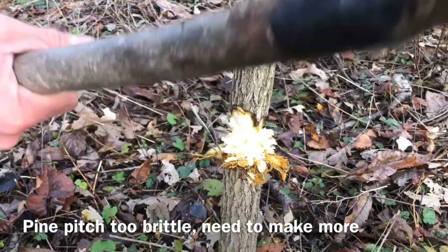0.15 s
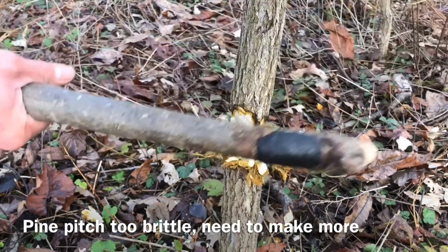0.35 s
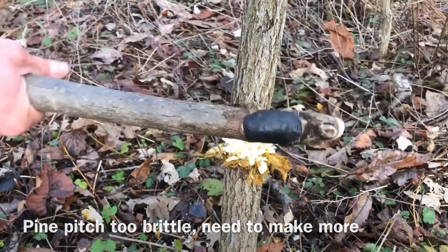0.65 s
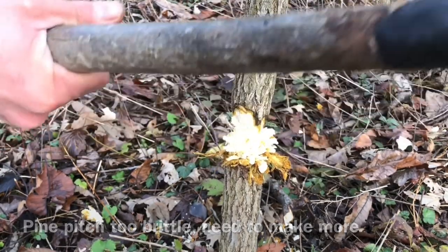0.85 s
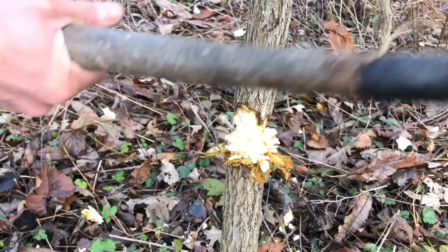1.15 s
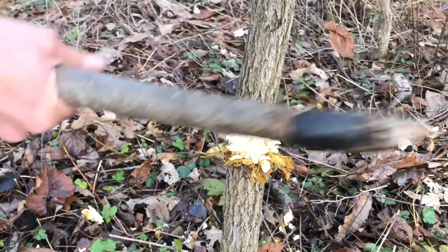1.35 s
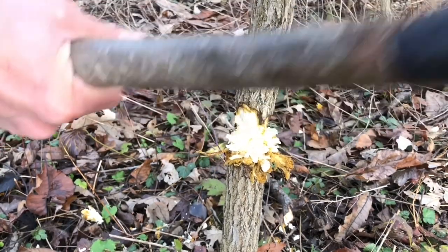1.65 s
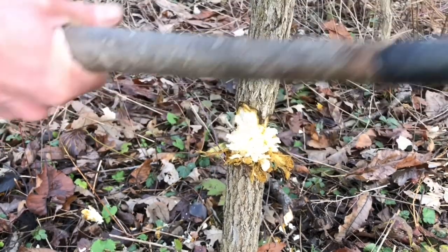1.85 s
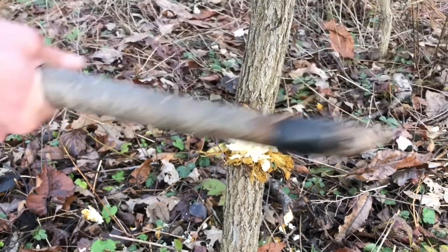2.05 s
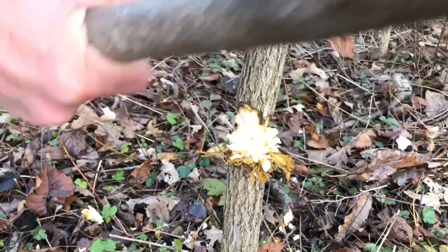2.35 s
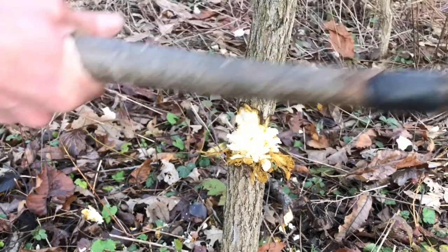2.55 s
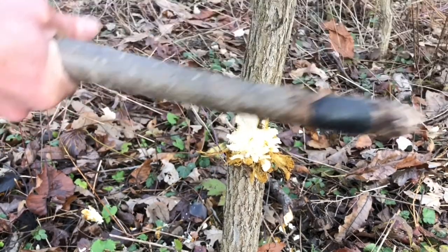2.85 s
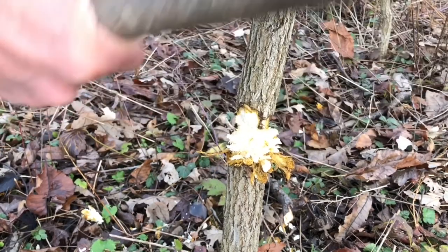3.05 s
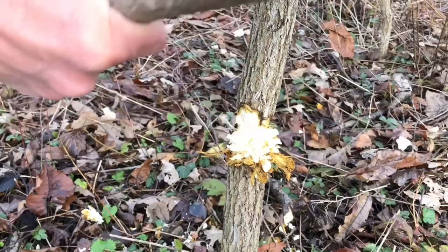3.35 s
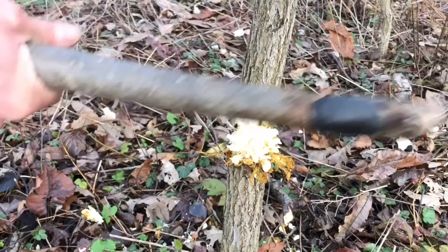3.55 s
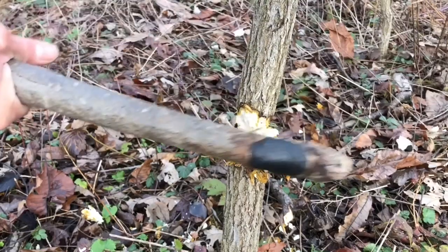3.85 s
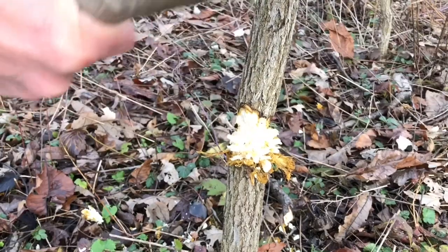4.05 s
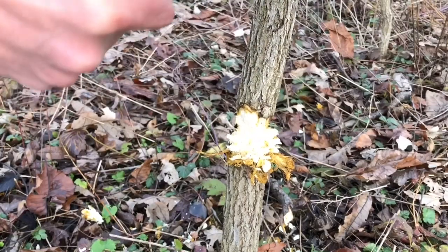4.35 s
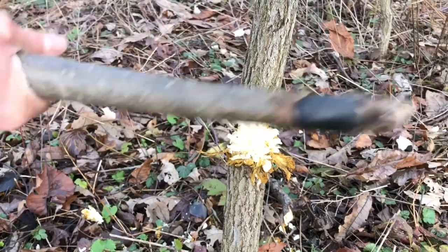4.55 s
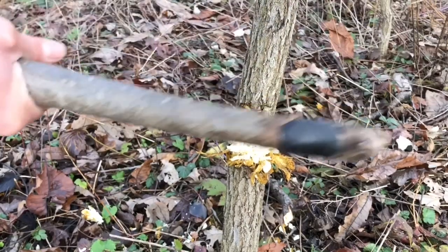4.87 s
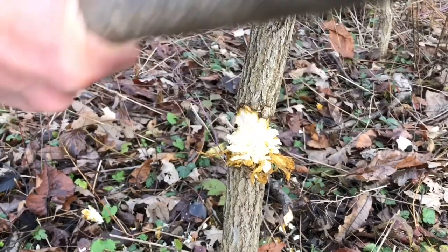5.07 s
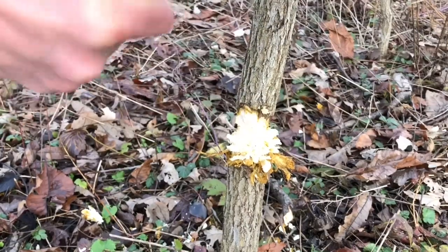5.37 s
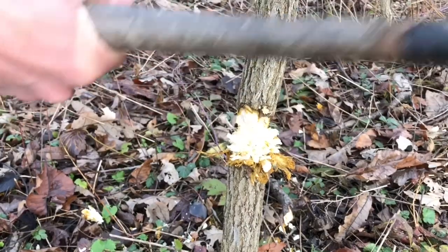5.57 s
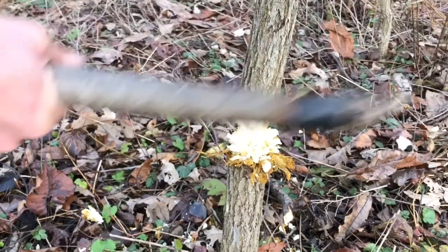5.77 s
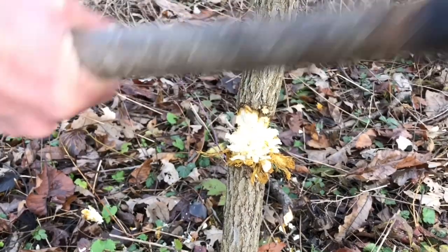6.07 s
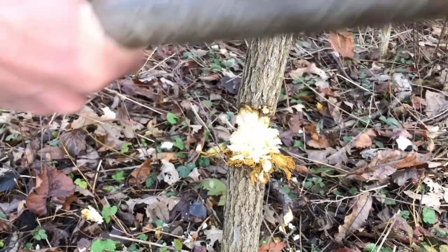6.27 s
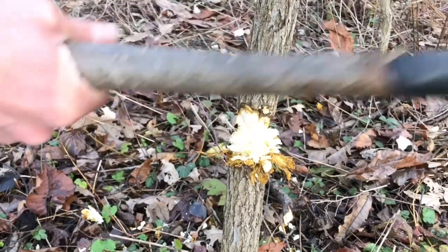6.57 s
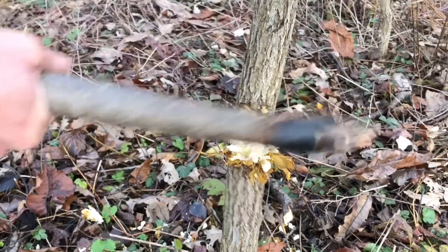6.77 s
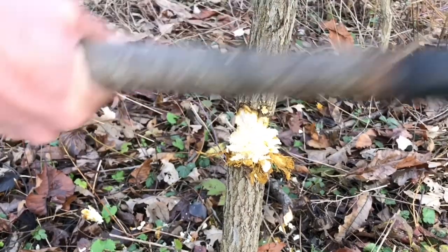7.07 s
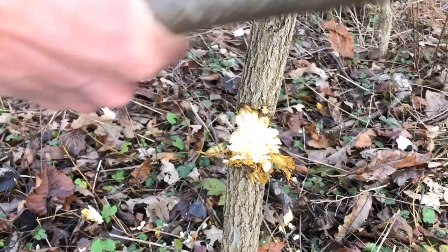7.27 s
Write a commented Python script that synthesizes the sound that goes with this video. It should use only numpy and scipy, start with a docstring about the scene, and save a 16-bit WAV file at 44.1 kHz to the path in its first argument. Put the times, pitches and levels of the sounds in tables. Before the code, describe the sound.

A hafted stone axe chops a thin standing trunk in a wood, close to a single microphone. The first blow lands at about 0.2 seconds, then twenty-one more follow evenly, roughly every third of a second, until 7.35. Each is a sharp, damped crack around 1.5 kHz, varying in force and pitch, with a brief hollow knock, quick rebound, slight low thud and crisp tearing fibres. Short echoes return from near brush, then the wood. Chips patter on dry leaves, most densely from 0.75 to 1.15, with scattered ticks later, notably at 4.1 and 5.1 to 5.4. Very bright, loud chip snaps fall between blows around 1.65, 2.0, 2.36, 2.7, 3.4, 3.7 and 6.7. Faint leaf rustle swells near 1.2. Far-off birds whistle briefly at 2.5, 3.45 and 6.9 and call nasally around 3.6 to 4.7 and 7.1, almost buried, over a very quiet distant rumble.

```python
"""A hafted stone axe chops a thin standing trunk in a wood, close to the microphone, three blows a second.
Each blow is a damped crack with edge modes, then ringing trunk and haft modes as the head knocks and rebounds.
Band-filtered noise makes the tearing fibres and the echoes off near brush and the wood.
Chips snap close by and patter on dry leaves as short noise-driven rings; fine ringing grains make the rustle.
Small birds whistle and call far off in gliding sines, over a low distant rumble of shaped noise."""
import sys
import numpy as np
from scipy import signal
from scipy.io import wavfile
from scipy.ndimage import uniform_filter1d

SR = 44100
rng = np.random.default_rng(int(sys.argv[2]) if len(sys.argv) > 2 else 0)


def master_out(mix):
    """Clip the mix to full scale and print it as 16-bit PCM to the path in sys.argv[1]."""
    frames = np.transpose(np.atleast_2d(mix))
    ceiling = np.clip(frames, -1, 1)
    pcm = np.round(ceiling * 32767).astype(np.int16)
    wavfile.write(sys.argv[1], SR, pcm)


N = 327222

# Spectrum of the distant rumble: (frequency [Hz], relative density [dB per Hz])
RUMBLE_SPECTRUM = [(25, -21.5), (55, 1), (90, -4), (140, -4.5), (225, -12), (560, -18), (880, -22.5),
                   (1370, -23.5), (2100, -28.5), (4300, -37.5), (9000, -39.5), (16000, -43.5)]
# Arched bird whistles: (start [s], length [s], level before shaping [dB])
WHISTLES = [(2.46, 0.037, -71), (3.452, .058, -66), (6.89, 0.066, -63)]
# Pitch arch of a whistle: (share of length [0-1], frequency [Hz])
WHISTLE_ARCH = [(0, 5600), (.2, 6700), (.45, 7300), (.7, 7100), (.88, 6200), (1, 4600)]
# Nasal bird calls: (start [s], length [s], start [Hz], middle [Hz], end [Hz], level before partials [dB])
NASAL_CALLS = [(3.6, .08, 3500, 3750, 3700, -66), (3.84, .13, 3650, 3880, 3800, -64),
               (4.09, .13, 3800, 3880, 3650, -64), (4.595, .1, 3850, 3980, 3850, -63),
               (7.08, .11, 3950, 4000, 3850, -63), (7.25, .09, 3800, 4000, 4000, -64)]
# Parallel partials of a nasal call: (offset [Hz], relative level [dB])
NASAL_PARTIALS = [(-370, -10), (5, -7), (370, -20)]
# Leaf rustle as it swells and dies down: (time [s], level of the grains [dB])
RUSTLE_LEVEL = [(0.0, -69.5), (0.4, -66), (0.6, -68), (1.15, -61.5), (1.42, -71.5), (1.9, -66), (2.5, -78),
                (7.42, -74.5)]
# Louder chips and bark landing on dry leaves:
# (time [s], level of the bright part [dB], ring [Hz], share at 4 kHz [dB])
LEAF_TICKS = [(0.207, -46, 6300, -18), (0.2903, -41.5, 7600, -14), (0.355, -41, 9500, -20),
              (0.4163, -42.5, 6000, -8), (0.7472, -46, 5180, -24.5), (0.7741, -42, 7000, -19),
              (0.83, -41, 7000, -3), (0.854, -38, 9170, 4.5), (0.8803, -36, 11200, -8),
              (1.0, -27, 7640, -29), (1.0408, -37, 6260, -22), (1.154, -38.5, 6620, -10.5),
              (1.5644, -46.5, 8550, -18), (1.7222, -34.5, 6360, -2), (1.8228, -43.5, 4960, -9),
              (1.8728, -42.5, 13100, -27.5), (2.0637, -35, 12500, -26), (2.77, -40.5, 10400, -29),
              (3.283, -44.5, 11200, -24), (3.4466, -42, 10600, -22), (4.126, -30.5, 6000, 6),
              (4.1408, -46.5, 6600, 11), (4.846, -49.5, 5690, -20), (4.238, -48, 9000, -20),
              (4.9144, -43.5, 5250, -31), (5.1048, -36, 6510, -16), (5.1575, -32.5, 6940, -1.5),
              (5.223, -46, 8200, -13), (5.322, -33.5, 13900, -20), (5.3988, -32.5, 6880, -1),
              (5.6354, -40.5, 5230, 8.5), (7.1003, -36, 13900, -21)]
# Flying chips that strike something hard near the microphone:
# (time [s], level of the bright part [dB], share at 4 kHz [dB])
CHIP_SNAPS = [(1.646, -6, -11.5), (1.9915, -1, -20), (2.3588, -5, -35), (2.4295, -26.5, -27),
              (2.7029, -1.5, -38), (3.3796, -2.5, -28), (3.7205, -2, -45), (4.4113, -20, -2.5),
              (5.0735, -10.5, -23), (5.4272, -18.5, -29), (6.3712, -19.5, -20), (6.714, -8, -13.5),
              (6.769, -22, -27), (7.0345, -10.5, -9.5)]
# Echoes of the wood: (frequency [Hz], relative level [dB])
WOOD_ECHO = [(55, -29.5), (90, -33), (150, -26.5), (230, -39), (450, -41), (800, -45), (1400, -31.5),
             (2500, -32), (4200, -32.5), (7000, -44), (16000, -55.5)]
# Decay of the wood echoes: (frequency [Hz], t60 [s])
WOOD_ECHO_T60 = [(60, 0.82), (150, 0.45), (500, 0.7), (1500, 0.56), (4000, 0.36), (16000, 0.28)]
# Echoes off near brush: (frequency [Hz], relative level [dB])
NEAR_ECHO = [(100, -49), (400, -20.5), (800, -19), (1500, -17), (4000, -23), (8000, -21), (16000, -22)]
# Decay of the near echoes: (frequency [Hz], t60 [s])
NEAR_ECHO_T60 = [(100, .2), (400, 0.099), (1500, 0.066), (5000, .09), (16000, 0.083)]
# Tearing fibres: (frequency [Hz], relative level [dB])
SPLINTER = [(700, -21.5), (1500, -15), (3000, -12.5), (5000, 1), (8000, 4), (12000, 8), (16000, 5)]
# Decay of the tearing: (frequency [Hz], t60 [s])
SPLINTER_T60 = [(500, 0.075), (1300, 0.058), (2900, 0.033), (6000, 0.013), (16000, 0.011)]
# Trunk and haft modes:
# (frequency [Hz], relative level [dB], t60 at the first contact [s], delay [s], 0 knock or 1 thud)
WOOD_MODES = [(72, 0.5, 0.1, .013, 1), (118.5, -8.5, 0.17, .008, 1), (153, 3, 0.081, .008, 1),
              (228, -12.5, 0.019, 0.002, 0), (278, -2.5, 0.012, 0.00084, 0), (312, -6, 0.043, .0025, 0),
              (378, 1.5, .012, .0025, 0), (382, -3.5, 0.052, .0025, 0), (483, -4.5, 0.029, .0025, 0),
              (638, -9, 0.046, 0.0028, 0)]
# Modes under the crack, varied at each blow: (nominal frequency [Hz], relative level [dB], t60 [s])
EDGE_MODES = [(800, -6, .018), (1050, -3, .014), (1300, -9, .025), (2000, -10, .008), (2550, -5, .006),
              (3100, -4, .005), (3800, -3, .005), (4600, -6, .004)]
# Axe blows: (time [s], crack peak [dB], crack note [Hz], knock [dB], rebound [dB],
# edge near 4 kHz [dB], splinter near 11 kHz [dB], echo [dB])
BLOWS = [(0.1694, 0.5, 1073, -21, -32.5, -15.5, -31.5, -25),
         (0.5444, -9, 1540, -31, -37.5, -16.5, -23.5, -20),
         (0.9155, -0.5, 1337, -13, -37.5, -10, -15.5, -26), (1.2797, -8, 1620, -24, -27, -15, -24, -20.5),
         (1.6204, -4, 1500, -22.5, -42, -12, -18, -21.5), (1.9719, -2, 1440, -25.5, -51, -17, -21.5, -25),
         (2.3375, -6.5, 1550, -40, -35.5, -13.5, -25, -19),
         (2.6825, -3, 1480, -17.5, -33.5, -16, -18, -26.5),
         (3.0198, -5, 1514, -24.5, -21, -16.5, -23.5, -21),
         (3.357, -3.5, 1483, -25.5, -22.5, -14.5, -23.5, -24.5),
         (3.6954, -0.5, 1486, -25.5, -37, -16.5, -15.5, -24.5),
         (4.033, -5, 1595, -20, -46, -21.5, -11, -28), (4.3654, -6, 1600, -26, -26, -13.5, -30, -20),
         (4.6971, -1, 1496, -16, -32, -13.5, -10, -28.5), (5.0348, -9.5, 2200, -26, -47, -18, -15, -19.5),
         (5.3632, -4.5, 1380, -16, -39.5, -15, -24.5, -22.5),
         (5.6857, -5.5, 1510, -26.5, -26.5, -14, -20.5, -22),
         (6.0197, -5.5, 1575, -29.5, -30, -14.5, -20.5, -19),
         (6.3506, -4.5, 1502, -35.5, -32.5, -14, -24.5, -20.5),
         (6.682, -2.5, 2153, -24, -35, -14.5, -23, -18), (7.0109, 1.5, 1470, -18, -33.5, -11.5, -20, -21),
         (7.352, -3, 1684, -23.5, -29.5, -14.5, -19, -18)]

RUMBLE_DB = -56.5
GRAINS_PER_S = 870   # before clumping
CLUMP_S, CLUMP_DB = .015, 7   # smoothing span; rise in grain rate per unit of clumping
SNAP_HZ = 11780
DULL_HZ, DULL_T60_S, CHIP_CUT_HZ = 4000, .0018, 2000
CHIP_LAG_S, GROUND_LAG_S = .00065, .0025   # direct sound and ground return, after the table time
THUD_DB, CRACK_T60_S = -31, 0.009   # alike for every blow
REBOUND_S = .0085   # the head bounces and knocks the trunk again
REBOUND_RING = 1.4   # the trunk rings this many times longer once the head has bounced clear
SEAT_S = 0.0033   # the head seats in the cut a moment after the edge bites
BITE_HZ, BITE_T60_S, BITE_DB = 3430, 0.0034, 10   # first click of the edge; dB above the edge level
BASS_CUT_HZ, TOP_CUT_HZ, STEEP_CUT_HZ = 62.7, 15800, 17150


def from_db(db):
    """Decibels to gain."""
    return 10 ** (np.asarray(db) / 20)


def rms_one(x):
    """Scale to rms 1."""
    return x / np.sqrt(np.mean(x ** 2) + 1e-20)


def at_hz(points, hz):
    """Read a table on a log-frequency axis."""
    table_hz, values = np.transpose(points)
    return np.interp(np.log(hz), np.log(table_hz), values)


def in_time(rows):
    """Columns of a curve, sample by sample."""
    s, *columns = np.transpose(rows)
    return [np.interp(np.arange(N) / SR, s, c) for c in columns]


def clicks(seconds, gains):
    """A train of single-sample impulses."""
    out = np.full(N, 1e-18)   # the tiny offset keeps the filters out of denormal numbers
    np.add.at(out, np.minimum((np.asarray(seconds) * SR).astype(int), N - 1), gains)
    return out


def ring(x, hz, t60):
    """Two-pole resonator: a unit click sets a decaying sine of height 1 ringing."""
    r, w = from_db(-60 / (t60 * SR)), 2 * np.pi * hz / SR
    return signal.lfilter([0, np.sin(w)], [1, -2 * r * np.cos(w), r * r], x)


def fade(x, t60):
    """Each click becomes an exponential decay."""
    return signal.lfilter([1], [1, -from_db(-60 / (t60 * SR))], x)


def butter_filter(x, order, hz, kind):
    """Butterworth filter."""
    return signal.sosfilt(signal.butter(order, hz, kind, fs=SR, output="sos"), x)


def add(out, s, piece):
    """Mix a piece in at time s."""
    i = round(s * SR)
    out[i:i + len(piece)] += piece[:N - i]


def bands():
    """Half-octave band-pass filters, each with white noise scaled to leave it at rms 1."""
    edges = 25 * 2 ** np.arange(0, 9.6, .5)
    white = rng.standard_normal((2, N))   # taken in turn, so neighbouring bands are unrelated
    for k, (low, high) in enumerate(zip(edges, edges[1:])):
        sos = signal.butter(2, [low, high], "band", fs=SR, output="sos")
        noise = white[k % 2] * np.sqrt(SR / 2 / (high - low))
        yield np.sqrt(low * high), high - low, sos, noise


def distant_rumble():
    """Steady noise, band by band, weighted strongly towards the bass."""
    out = np.zeros(N)
    for hz, width_hz, sos, noise in bands():
        gain = from_db(at_hz(RUMBLE_SPECTRUM, hz)) * np.sqrt(width_hz)
        out += gain * signal.sosfilt(sos, noise)
    return from_db(RUMBLE_DB) * rms_one(out)


def birds():
    """Far-off calls as gliding sines: arched pure whistles and nasal calls of three parallel partials."""
    out = np.zeros(N)
    for s, length, db in WHISTLES:
        u = np.linspace(0, 1, round(length * SR))
        hz = uniform_filter1d(np.interp(u, *np.transpose(WHISTLE_ARCH)), size=300)
        swell = np.sin(np.pi * u) ** .5 * (0.33 + u)   # stronger towards the end
        add(out, s, from_db(db) * swell * np.sin(2 * np.pi * np.cumsum(hz) / SR))
    for s, length, start_hz, middle_hz, end_hz, db in NASAL_CALLS:
        u = np.linspace(0, 1, round(length * SR))
        hz = uniform_filter1d(np.interp(u, [0, .5, 1], [start_hz, middle_hz, end_hz]), size=1200)
        swell = np.sin(np.pi * u) ** .5
        for offset_hz, part_db in NASAL_PARTIALS:
            partial = np.sin(2 * np.pi * np.cumsum(hz + offset_hz) / SR)
            add(out, s, from_db(db + part_db) * swell * partial)
    return out


def rustle():
    """Dry leaves shift: fine grains of uneven size, ringing a few cycles in the treble, over a soft wash."""
    level_db, = in_time(RUSTLE_LEVEL)
    sizes = from_db(4 * np.minimum(rng.exponential(1, N), 4)) * rng.choice([-1, 1], N)
    clumps = rms_one(uniform_filter1d(rng.standard_normal(N), size=round(CLUMP_S * SR)))
    born = rng.random(N) < GRAINS_PER_S * from_db(CLUMP_DB * clumps) / SR
    pitch_of = rng.integers(0, 10, N)   # each grain is dealt one of ten pitches
    grains = np.zeros(N)
    for k, hz in enumerate(np.geomspace(3500, 14000, 10)):
        grains += ring(sizes * born * (pitch_of == k) + 1e-18, hz, 5.2 / hz)
    wash = butter_filter(rng.standard_normal(N), 2, [3500, 13000], "band")
    return from_db(level_db) * (rms_one(grains) + from_db(-9) * rms_one(wash))


def chips(table, t60, tail_db, tail_t60):
    """A chip hits: a burst of tiny contacts rings a bright note, a duller part and a short hiss."""
    out, t = np.zeros(N), np.arange(round(0.045 * SR)) / SR
    noise = rng.standard_normal((len(table), 2, len(t)))
    for (s, peak_db, hz, dull_db), (contacts, breath) in zip(table, noise):
        burst = contacts * from_db(-60 * t / t60)
        bright = ring(burst, min(hz, .4 * SR), 0.00098)
        dull = ring(burst, DULL_HZ, DULL_T60_S)
        hiss = np.diff(breath, prepend=0) * from_db(tail_db - 60 * t / tail_t60)
        piece = bright / abs(bright).max() + from_db(dull_db) * dull / abs(dull).max() + hiss
        add(out, s + CHIP_LAG_S, from_db(peak_db) * piece)
        add(out, s + GROUND_LAG_S, from_db(peak_db - 13.5) * piece)   # the ground returns it
    return butter_filter(out, 2, CHIP_CUT_HZ, "high")


def echo_envelope(hz):
    """Echoes build up, then decay: near brush at once, the wood 15 ms later and more slowly."""
    s, _, _, _, _, _, splinter_db, echo_db = np.transpose(BLOWS)
    # the treble of the near echo follows the splintering
    treble = np.clip(np.log2(hz / 4500), 0, 1)
    near_db = echo_db + 0.81 * treble * (splinter_db - echo_db)
    soon, late = clicks(s, from_db(near_db)), clicks(s + 0.015, from_db(echo_db))
    near = fade(soon, at_hz(NEAR_ECHO_T60, hz)) - fade(soon, 0.036)
    far = fade(late, at_hz(WOOD_ECHO_T60, hz)) - fade(late, 0.043)
    return from_db(at_hz(NEAR_ECHO, hz)) * near + from_db(at_hz(WOOD_ECHO, hz)) * far


def splinter_envelope(hz):
    """Fibres tear at each blow, coloured by its own thud, knock, crack, edge and splinter levels."""
    s, crack_db, _, knock_db, rebound_db, edge_db, splinter_db, _ = np.transpose(BLOWS)
    knock_db = np.maximum(knock_db, rebound_db)   # the stronger of the two colours the noise
    colours = np.transpose([THUD_DB + 0 * s, knock_db, crack_db, edge_db, splinter_db])
    own_db = [at_hz(list(zip([120, 400, 1600, 4200, 11000], colour)), hz) for colour in colours]
    hit = clicks(s - .0004, from_db(own_db))
    return from_db(at_hz(SPLINTER, hz) - 8.5) * fade(hit, at_hz(SPLINTER_T60, hz))


def splinters_and_echoes():
    """Tearing and echoes shape the same noise in each band, so their envelopes add directly."""
    out = np.zeros(N)
    for hz, _, sos, noise in bands():
        out += signal.sosfilt(sos, noise * (splinter_envelope(hz) + echo_envelope(hz)))
    return out


def knock():
    """Trunk and haft modes ring after the contact, the low ones later; the knock modes again at the rebound."""
    s, _, _, knock_db, rebound_db, *_ = np.transpose(BLOWS)
    knocks, thuds = np.zeros((2, N))
    chance_db = rng.normal(0, 1.3, (len(BLOWS), len(WOOD_MODES)))
    for (hz, db, t60, delay, is_thud), own_db in zip(WOOD_MODES, chance_db.T):
        if is_thud > .5:
            thuds += ring(clicks(s + delay, from_db(THUD_DB + db + own_db)), hz, t60)
        else:
            first = clicks(s + delay, from_db(knock_db + db + own_db))
            again = clicks(s + delay + REBOUND_S, from_db(rebound_db + db))
            knocks -= ring(first, hz, t60) + ring(again, hz, REBOUND_RING * t60)
    return butter_filter(knocks, 2, [170, 900], "band") + butter_filter(thuds, 2, 260, "low")


def crack():
    """The edge bites: the contact swells a damped note within a cycle and rings modes varied at each blow."""
    out, chances = np.zeros(N), rng.normal(0, 1, (len(BLOWS), len(EDGE_MODES)))
    # neighbouring modes swing in opposite sense, so no gap opens between them
    signs = (-1) ** np.arange(len(EDGE_MODES))
    contact = signal.unit_impulse(round(.06 * SR))
    bite = ring(contact, BITE_HZ, BITE_T60_S)
    for (s, peak_db, hz, knock_db, _, edge_db, *_), chance in zip(BLOWS, chances):
        push = ring(ring(contact, 2.4 * hz, 0.001), 1.69 * hz, 0.0035)
        note = np.diff(ring(push, hz, CRACK_T60_S), prepend=0)   # air hears the acceleration
        modes = np.zeros(len(contact))
        for (mode_hz, db, t60), c, sign in zip(EDGE_MODES, chance, signs):
            modes += sign * from_db(db + 0.5 * c) * ring(contact, mode_hz * (1 + 0.09 * c), t60)
        add(out, s - .0001, from_db(edge_db + BITE_DB) * bite)
        add(out, s - .0002, from_db(peak_db) * note / abs(note).max())
        add(out, s - .0001, from_db(edge_db + 1.5) * modes)
        # the harder the knock, the louder the second contact
        add(out, s + SEAT_S, from_db(1.56 * knock_db + 8) * modes)
    return butter_filter(out, 2, 500, "high")


def scene():
    """All sources at the one microphone, from the far background to the axe."""
    background = distant_rumble() + birds() + rustle()
    snaps = [(s, db, SNAP_HZ, dull_db) for s, db, dull_db in CHIP_SNAPS]
    debris = chips(LEAF_TICKS, 0.008, -12.5, 0.017) + chips(snaps, 0.0041, -28.0, 0.036)
    axe = splinters_and_echoes() + knock() + crack()
    return (background + debris + axe)[None]


def record(dry):
    """The capsule cuts bass and top, peaks are rounded near full scale, then a steep low-pass follows."""
    heard = butter_filter(dry, 3, [BASS_CUT_HZ, TOP_CUT_HZ], "band")
    rounded = heard / (1 + abs(heard / .92) ** 4) ** .25
    steep = signal.cheby2(12, 60, STEEP_CUT_HZ, fs=SR, output="sos")
    return signal.sosfilt(steep, rounded)


dry = scene()
out = record(dry)
master_out(out)
```